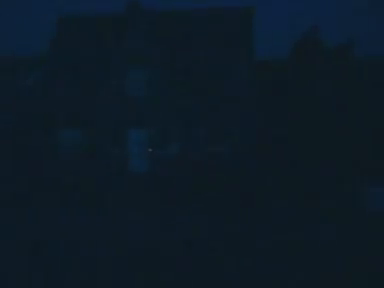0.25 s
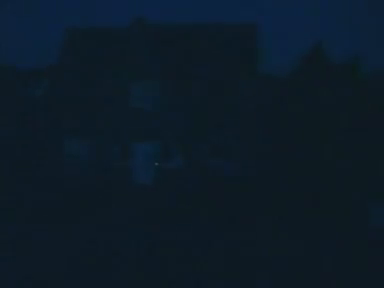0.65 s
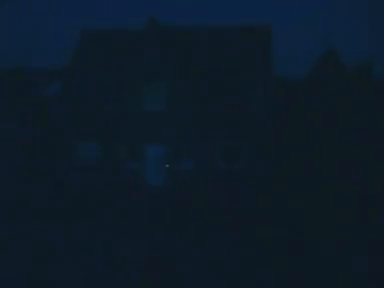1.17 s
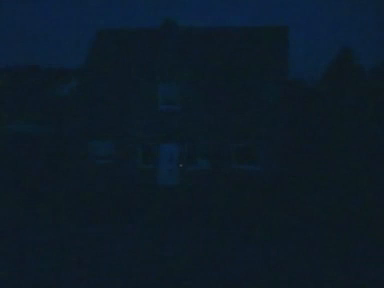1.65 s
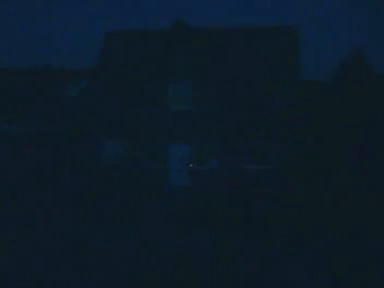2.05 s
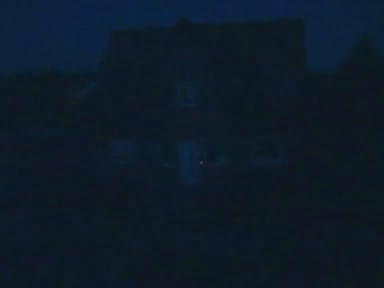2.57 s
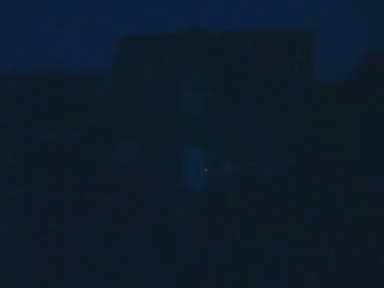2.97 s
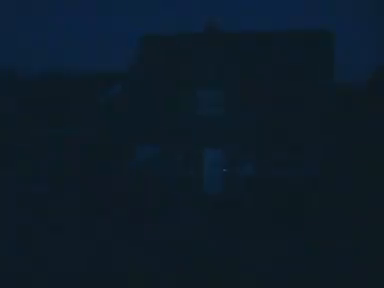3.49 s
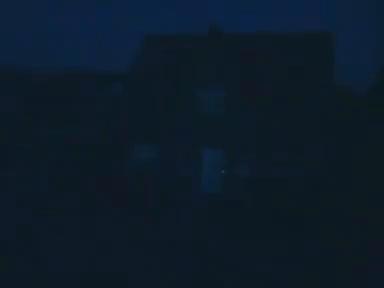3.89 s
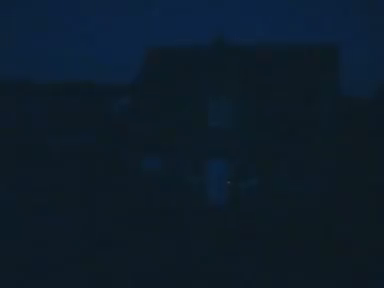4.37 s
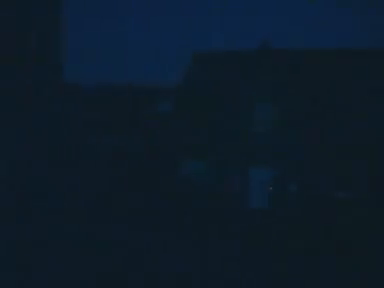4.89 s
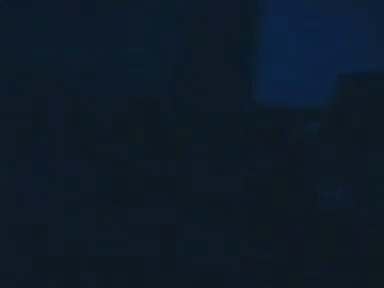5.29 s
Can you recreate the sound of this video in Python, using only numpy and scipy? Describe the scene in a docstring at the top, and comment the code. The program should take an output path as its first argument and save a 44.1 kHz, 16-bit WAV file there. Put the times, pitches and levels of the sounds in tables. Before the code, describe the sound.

Outdoors beside a dark house at dawn, many birds sing at once. Sharp slurs open nearby, then thin robin notes slide and shiver downwards. A rich blackbird flutes in the middle while a small bird adds high hooked chips. The robin briefly returns before a rapid trill and sharp slurs. Walls and trees echo everything; a small camera microphone adds faint hiss and whine.

```python
"""Dawn chorus beside a house, heard through a small camera's hiss and whine over a faint rising rumble.
Near and far, birds whistle and chatter throughout; a songbird in the nearest bush opens with slurs.
A robin slides and shivers downwards, then a blackbird flutes while a small bird adds high hooked notes.
The robin returns, the songbird trills and slurs again. Each note is a nearly pure, shaking tone;
walls throw the songs back as echoes and leaves and trees scatter them as shaped noise."""
import sys
import numpy as np
from scipy import signal
from scipy.fft import rfft, irfft, next_fast_len
from scipy.io import wavfile
from scipy.ndimage import map_coordinates

SR = 44100
rng = np.random.default_rng(int(sys.argv[2]) if len(sys.argv) > 2 else 0)


def to_wav(sig):
    """Store sig (one row per channel, or 1-D mono) as 16-bit WAV at the path in sys.argv[1].

    Samples outside -1..1 are clipped; the rate is SR.
    """
    pcm = np.clip(np.atleast_2d(sig), -1, 1) * 32767
    pcm = np.round(pcm).astype(np.int16)
    wavfile.write(sys.argv[1], SR, pcm.T)  # frames by channels


N = 244314  # length in samples

# Hiss and rumble of the air at the microphone. Each row: frequency in Hz, relative density in dB.
AIR_SPECTRUM = [(15, -41), (25, -3.5), (60, -7), (142, 1.5), (208, -3.5), (262, 0), (384, -5), (847, -6),
                (938, -7), (1270, -8), (2180, -4.5), (3920, -11), (7220, -15), (7800, -14.5),
                (11200, -20.5), (14500, -68.5), (22000, -120)]
# Steady tones of the camera's whine. Each row: frequency in Hz, mean level in dB.
CAMERA_WHINE = [(273, -65.5), (935, -64), (7480, -67), (9868, -73), (11025, -83.5)]
# Course of the low rumble. Each row: time in seconds, relative level in dB.
RUMBLE_LEVEL = [(0, -73), (4.6, -56.5), (5.54, -43)]
# Course of the distant crowd of birds. Each row: time in seconds, relative level in dB.
CROWD_LEVEL = [(0.0, -39), (0.57, -42.5), (0.85, -46.5), (1.37, -42), (2.11, -42), (2.39, -47.5),
               (2.71, -39.5), (3.05, -38.5), (3.19, -40), (3.86, -36), (5.34, -47.5), (5.54, -51.5)]
# Colour of the distant crowd. Each row: frequency in Hz, gain in dB.
CROWD_COLOUR = [(1300, -54), (1800, 0), (2350, 2), (3100, -9), (4000, -8.5), (5500, -23), (7000, -7),
                (8500, -39)]
# Birds farther off. Each row: start in seconds, length in seconds, start pitch in Hz, end pitch in Hz,
# relative level in dB, warble depth in Hz.
FAR_NOTES = [ (0, 0.0654, 2700, 2480, -43.5, 360), (.02, 0.053, 4900, 3600, -47.5, 440),
             (.038, 0.068, 2980, 3000, -43.5, 24), (0.096, .045, 3244, 3259, -38, 220),
             (0.232, .045, 3100, 2730, -44, 200), (0.281, 0.086, 4450, 5250, -52.5, 457),
             (.345, .115, 3142, 2620, -39, 360), (0.514, 0.077, 2450, 2394, -43.5, 250),
             (0.66, 0.0555, 2935, 2226, -44.5, 350), (0.834, 0.043, 4440, 4920, -53.5, 440),
             (0.937, 0.077, 3130, 3157, -42, 88), (1.085, .14, 1720, 1900, -49, 36),
             (1.225, 0.066, 1850, 1810, -44, 10), (1.391, 0.071, 1900, 1835, -39.5, 10),
             (1.462, 0.14, 2620, 2404, -42, 110), (1.563, 0.076, 2720, 2740, -49, 14),
             (1.63, .075, 2570, 2130, -47, 14), (1.704, 0.079, 2200, 1670, -43, 13),
             (1.78, 0.091, 1477, 1468, -48, 8), (1.823, .062, 3220, 3090, -43.5, 60),
             (2, 0.43, 2783, 2621, -51.5, 38), (2.32, .13, 2805, 2852, -52, 17),
             (2.258, 0.28, 2204, 2006, -44.5, 37), (2.859, 0.081, 2066, 1782, -37, 126),
             (2.949, .28, 1656, 1480, -48.5, 7.9), (3.323, 0.077, 2520, 2530, -35.5, 37),
             (3.444, 0.13, 2154, 2144, -39.5, 106), (3.94, .16, 1404, 1700, -56.5, 20),
             (4.028, .07, 2595, 2510, -44.5, 85), (4.078, 0.12, 3037, 3003, -39, 190),
             (4.25, 0.095, 1510, 1690, -51, 12), (4.522, .04, 1980, 1920, -49, 26),
             (4.681, 0.2195, 2200, 3222, -39, 294), (4.756, 0.24, 4830, 5310, -53.5, 660),
             (4.85, 0.11, 3103, 3000, -42.5, 245), (5.178, 0.051, 3130, 3210, -46, 45),
             (5.376, 0.2, 3000, 3100, -53.5, 85)]
# High hooked notes of the small bird. Each row: start in seconds, length in seconds, top pitch in Hz,
# leap in Hz, relative level in dB.
HOOKED_NOTES = [(2.77, 0.025, 7400, 2260, -38), (2.913, 0.0487, 7350, 2690, -37.5),
                (2.965, 0.0337, 7000, 2300, -40.5), (3.096, 0.029, 7190, 2380, -41),
                (3.136, 0.029, 7430, 2644, -38), (3.178, 0.0424, 7610, 2900, -35),
                (3.305, 0.0456, 6800, 200, -47.5), (3.342, 0.028, 5370, 1270, -39),
                (3.416, 0.025, 6650, 402, -44), (3.448, 0.04, 5240, 594, -40.5)]
# The songbird in the nearest bush. Each row: start in seconds, length in seconds, start pitch in Hz, end pitch
# in Hz, upward bow in Hz, relative level in dB. The row at 4.42 s is a wall echo of the 4.28 s line near 6.3
# kHz.
SONGBIRD_SLURS = [ (.008, 0.042, 4600, 7400, -450, -45), (.045, 0.037, 7270, 5300, -600, -46.5),
                  (.062, 0.0378, 5270, 5210, -5, -40.5), (.497, .025, 4430, 5330, 0, -47),
                  (.56, 0.0955, 5900, 4100, -750, -48.5), (.73, 0.066, 4510, 4440, 6, -49),
                  (4.268, 0.04345, 7600, 3630, -420, -43.5), (4.28, .092, 8200, 7900, -260, -41.5),
                  (4.28, 0.134, 6300, 5923, 43, -48), (4.293, 0.057, 3950, 4337, -630, -35),
                  (4.346, 0.0331, 3855, 3240, 927, -29.5), (4.375, 0.069, 6700, 6296, -100, -48),
                  (4.407, 0.024, 2700, 3240, 572.5, -28.5), (4.42, .085, 6050, 6075, 137, -47.5),
                  (4.53, 0.028, 6550, 6830, 427.5, -44), (4.582, .018, 6110, 4020, 130, -36.5),
                  (4.596, 0.0216, 6220, 3720, -160, -34.5), (4.88, .062, 8030, 7210, -160, -55),
                  (5.004, .018, 6100, 3350, 88, -39.5), (5.015, 0.027, 3550, 3545, -3, -36.5)]
# The songbird's trill notes. Each row: start in seconds, relative level in dB.
TRILL_NOTES = [(3.944, -38.5), (3.993, -35.5), (4.045, -35), (4.096, -35), (4.16, -35)]
# Pitch of one flick of the trill. Each row: time in seconds, pitch in Hz.
FLICK_PITCH = [(0, 6030), (.004, 6910), (.007, 6070), (.01, 4200), (.014, 3100)]
# The robin's slurs. Each row: start in seconds, length in seconds, start pitch in Hz, end pitch in Hz,
# upward bow in Hz, relative level in dB.
ROBIN_SLURS = [ (.962, 0.048, 4560, 6150, 550, -53), (1.018, 0.037, 5523, 6500, -500, -48.5),
               (1.056, .028, 6800, 7150, 200, -46), (1.05, 0.11, 2900, 3920, 152, -47.5),
               (1.12, 0.0547, 7217, 6600, 752, -47), (1.144, 0.019, 4963, 4650, 102, -33.5),
               (1.228, .035, 3970, 4030, 0, -50.5), (1.17, 0.037, 3850, 3040, 50, -44),
               (1.307, .047, 4465, 4400, -2, -33.5), (1.339, 0.028, 5600, 5500, 340, -42.5),
               (1.375, 0.026, 4200, 3000, 322, -36), (3.736, .052, 4240, 5120, -6, -42),
               (3.785, 0.051, 4720, 4830, 270, -38.5), (3.795, 0.077, 5670, 5150, 734, -45),
               (3.836, 0.083, 4900, 3900, -4, -45), (3.857, 0.053, 4800, 5120, 585, -39.5),
               (3.862, 0.0294, 8700, 7900, 0, -47)]
# The robin's long descents. Each row: start in seconds, start pitch in Hz, end pitch in Hz,
# relative level in dB.
ROBIN_DESCENTS = [(1.477, 7600, 4760, -42), (1.686, 7840, 5360, -44.5), (1.951, 7980, 5810, -45)]
# Blackbird syllables. Each row: start in seconds, length in seconds, attack in seconds, start, middle and end
# pitch in Hz, relative level in dB, burr depth in Hz. The short row at 3.704 s is a strong wall echo of the
# long syllable before it.
BLACKBIRD_SYLLABLES = [ (2.418, 0.0605, 0.045, 2380, 2385, 2440, -23.5, 146),
                       (2.48, 0.0429, .013, 1830, 1815, 1797, -23, 33.4),
                       (2.594, .158, 0.028, 2520, 2128, 2050, -26, 30),
                       (2.754, 0.065, .007, 2030, 2108, 2173, -22, 83),
                       (2.83, 0.097, .02, 3050, 3057, 2985, -28, 96.4),
                       (3.046, 0.28, 0.015, 2130, 2499, 2594, -22, 63.3),
                       (3.506, .15, .078, 1860, 1857, 1933, -21.5, 18),
                       (3.664, 0.0467, .005, 1909, 1900, 1900, -33, 15),
                       (3.704, .027, 0.0033, 1947, 1882, 1927, -25.5, 18),
                       (3.735, 0.045, 0.0055, 2265, 2300, 2300, -28.5, 140),
                       (3.773, .13, 0.0074, 2182, 2188, 2233, -22.5, 121)]
# Echoes from the walls. Each row: delay in seconds, relative level in dB.
WALL_ECHOES = [(.014, -9.5), (.024, -11), (.126, -16)]
# Ringing among the trees. Each row: frequency in Hz, time to fall by 60 dB in seconds.
TREE_DECAY = [(1000, 0.26), (3000, 1), (8000, 0.48)]
# Treble that birdsong loses on the way. Each row: frequency in Hz, gain in dB.
TREBLE_LOSS = [(6800, 0), (7600, -5.5), (8400, -9.5), (11000, -9.5)]

TOP_HZ = 11250  # the camera's band limit
HOUSE_DELAY = 0.051  # s, the long way round by the house front
NOTE_PEAK = 0.6  # a note is strongest this far through its length
FAR_BOW_HZ = 56.1  # the farther birds' notes all bow a little upwards
HOOK_LEAP_S, HOOK_DROOP_HZ = 0.008, 348  # typical time of the leap; fall from the top by the end
FLICK_S = 0.014  # spacing of the flicks in a trill note
# A descent's length, the power of time by which its fall steepens, and its growth in dB.
DESCENT_S, DESCENT_CURVE, DESCENT_SWELL_DB = 0.158, 1.3, 1.5
# The shiver that grows along a descent: rate, pitch swing, level swing.
SHIVER_HZ, SHIVER_DEPTH_HZ, SHIVER_DB = 52.1, 114, 8.5
# During the attack a blackbird syllable climbs to its pitch and swells by this much.
SCOOP_HZ_PER_S, SCOOP_DB = 9800, 30
# At its end it sags by a share RELAX of the way to a resting pitch, over this part of its length.
REST_HZ, RELAX, RELAX_PART = 1805, 0.597, 0.11


def amp(db):
    """Decibels to gain."""
    return 10 ** (np.asarray(db) / 20)


def unit(x):
    """Scale to rms 1."""
    return x / np.sqrt(np.mean(x ** 2) + 1e-20)


def along(points, hz):
    """Read (Hz, value) points on a log frequency axis."""
    f, v = np.transpose(points)
    return np.interp(np.log(hz + 1), np.log(f + 1), v)


def level_over_time(points):
    """Read (s, dB) points at every sample."""
    s, db = np.transpose(points)
    return np.interp(np.arange(N) / SR, s, db)


def wobble(rate, size):
    """A smooth random curve, rate knots a second."""
    knots = rng.standard_normal(int(size * rate / SR) + 4)
    return map_coordinates(knots, [np.arange(size) * rate / SR])


def filtered(x, response):
    """Multiply the spectrum of x by a response of frequency."""
    m = next_fast_len(N + 8192)  # padded, so the end does not wrap to the start
    return irfft(rfft(x, m) * response(np.fft.rfftfreq(m, 1 / SR)), m)[:N]


def add(track, s, sound):
    """Mix a sound into a track at time s."""
    start = max(round(s * SR), 0)
    part = track[start:start + len(sound)]
    part += sound[:len(part)]


def arc(length, start, middle, end):
    """A pitch bending smoothly through three points."""
    u = np.linspace(0, 1, int(length * SR))
    return np.polyval(np.polyfit([0, .5, 1], [start, middle, end], 2), u)


def whistle(hz, warble_hz, rate_hz, edge, rough=0.535, flutter_db=2.5, overtone_db=-36):
    """The syrinx: a nearly pure tone whose pitch and strength shake quickly and unevenly."""
    size = len(hz)
    uneven_rate = rate_hz * (1 + 0.331 * wobble(90, size))
    shake = np.sin(2 * np.pi * np.cumsum(uneven_rate) / SR)
    shaken_hz = hz + warble_hz * (shake + rough * wobble(900, size))
    phase = 2 * np.pi * np.cumsum(shaken_hz) / SR
    tone = np.sin(phase) + amp(overtone_db) * np.sin(2 * phase)
    tone = tone * amp(flutter_db * wobble(198.4, size))
    return unit(tone) * signal.windows.tukey(size, np.clip(edge, 0, 1))


def phrase(notes, rate_hz, edge, rough, flutter_db, swell_db):
    """One bowed, warbled glide for each note, which swells to its peak and eases off."""
    song = np.zeros(N)
    for s, length, start, end, bow_hz, db, warble_hz in notes:
        hz = arc(length, start, (start + end) / 2 + bow_hz, end)
        tone = whistle(hz, warble_hz, rate_hz, edge, rough, flutter_db)
        off_peak = np.linspace(0, 1, len(tone)) / NOTE_PEAK - 1
        add(song, s, amp(db) * unit(amp(-swell_db * off_peak ** 2) * tone))
    return song


def warbled(notes, steady_hz, hz_per_octave_s):
    """Give each slur a warble depth: the faster the glide, the more it shakes."""
    out = []
    for s, length, start, end, bow_hz, db in notes:
        octaves_per_s = abs(np.log2(end / start)) / length
        out.append((s, length, start, end, bow_hz, db, steady_hz + hz_per_octave_s * octaves_per_s))
    return out


def house_echo(x, echo_db):
    """A bird facing the house is heard twice, the second time off the house front."""
    out = x.copy()
    add(out, HOUSE_DELAY, amp(echo_db) * x)
    return out


def outdoors(x, walls_db, leaves_db, trees_db):
    """Direct sound, distinct wall echoes, a quick scatter from near leaves and a long tail from the trees."""
    out = x.copy()
    for delay, db in WALL_ECHOES:
        add(out, delay, amp(db + walls_db) * x)
    # The tail is noise that dies away at a different pace in each band.
    hz, t, bands = signal.stft(rng.standard_normal(SR), SR, nperseg=256)
    decay = 1000. ** (-t / along(TREE_DECAY, hz)[:, None])
    tail = signal.istft(bands * decay, SR, nperseg=256)[1][:SR]
    age = np.arange(SR) / SR / 0.0039
    scatter = rng.standard_normal(SR) * age * np.exp(-age)  # builds up just after the direct sound
    leaves = amp(leaves_db) * scatter / np.linalg.norm(scatter)
    trees = amp(trees_db) * tail / np.linalg.norm(tail)
    return out + signal.fftconvolve(x, leaves + trees)[:N]


def background():
    """Steady noise hiss, a low noise band that rises, and the camera's slightly unsteady sine whine."""
    t = np.arange(N) / SR
    air = unit(filtered(rng.standard_normal(N), lambda hz: amp(along(AIR_SPECTRUM, hz))))
    low = unit(filtered(rng.standard_normal(N), lambda hz: np.exp(-((hz - 240) / 130) ** 2)))
    rumble = amp(level_over_time(RUMBLE_LEVEL) - 12.5) * low
    whine = np.zeros(N)
    for hz, db in CAMERA_WHINE:
        level = amp(db + 0.36 * wobble(2.4, N))
        whine += level * np.sin(2 * np.pi * hz * t + 0.8 * wobble(8.4, N))
    return amp(-49.5) * air + rumble + np.sqrt(2) * whine  # root 2 takes sine peak to rms


def chorus(count=400):
    """Many distant chirps and whistles, heard as much through their echoes as directly."""
    song = np.zeros(N)
    for when, pitch, life, bend, slide, loudness in rng.random((count, 6)):
        hz = 1700 * 4.2 ** pitch
        contour = hz * arc(0.03564 + .11 * life, 1, 1 + 0.27 * (bend - .5), 1 + 0.5476 * (slide - .5))
        chirp = whistle(contour, warble_hz=46, rate_hz=71, edge=0.89)
        add(song, when * N / SR, amp(7.2 * loudness) * chirp)
    song = outdoors(song, walls_db=4, leaves_db=-5, trees_db=0)
    crowd = filtered(song, lambda hz: amp(along(CROWD_COLOUR, hz)))
    return unit(crowd) * amp(level_over_time(CROWD_LEVEL) - 5.5)


def neighbours():
    """Whistles and buzzes from farther gardens: warbled glides blurred by the trees."""
    notes = [(s, length, start, end, FAR_BOW_HZ, db, warble_hz)
             for s, length, start, end, db, warble_hz in FAR_NOTES]
    song = phrase(notes, rate_hz=105, edge=0.42, rough=0.37, flutter_db=3.0, swell_db=3)
    return outdoors(song, walls_db=-4, leaves_db=-10, trees_db=-9)


def small_bird():
    """Each note leaps to its top pitch, never twice at quite the same speed, and droops from there."""
    song = np.zeros(N)
    for s, length, top, leap_hz, db in HOOKED_NOTES:
        t = np.arange(int(length * SR)) / SR
        leap_s = HOOK_LEAP_S * np.exp(0.198 * rng.standard_normal())
        leap = leap_hz * np.exp(-(t / leap_s) ** 2)
        droop = HOOK_DROOP_HZ * (t / length) ** 3
        tone = whistle(top - leap - droop, warble_hz=150, rate_hz=260, edge=0.16, rough=0.7, flutter_db=4.5)
        add(song, s, amp(db) * tone)
    return outdoors(house_echo(song, echo_db=-5), walls_db=-3, leaves_db=-8, trees_db=-8)


def songbird():
    """Sharp slurs, and a trill of which each note is three quick flicks of pitch."""
    slurs = warbled(SONGBIRD_SLURS, steady_hz=42, hz_per_octave_s=6.6)
    song = phrase(slurs, rate_hz=220, edge=0.22, rough=0.44, flutter_db=2.5, swell_db=6.5)
    times, pitches = np.transpose(FLICK_PITCH)
    flick = np.interp(np.arange(0, times[-1], 1 / SR), times, pitches)
    for s, db in TRILL_NOTES:
        for k, flick_db in enumerate([1, 0, -3]):
            tone = whistle(flick, warble_hz=200.4, rate_hz=332, edge=0.19)
            add(song, s + k * FLICK_S, amp(db + flick_db) * tone)
    return amp(.5) * outdoors(song, walls_db=-2, leaves_db=-9, trees_db=-10)


def descent(start, end):
    """A thin note that swells, falls ever faster and starts to shiver."""
    u = np.linspace(0, 1, int(DESCENT_S * SR))
    shiver = np.sqrt(u) * np.sin(2 * np.pi * (SHIVER_HZ * DESCENT_S * u + rng.random()))
    hz = start + (end - start) * u ** DESCENT_CURVE + SHIVER_DEPTH_HZ * shiver
    tone = whistle(hz, warble_hz=130, rate_hz=710, edge=0.26, rough=.4, flutter_db=2.0)
    return unit(amp(SHIVER_DB * shiver + DESCENT_SWELL_DB * u) * tone)


def robin():
    """Thin sliding notes and long descents, each doubled by the house front."""
    slurs = warbled(ROBIN_SLURS, steady_hz=95, hz_per_octave_s=1.3)
    song = phrase(slurs, rate_hz=440, edge=0.1, rough=0.26, flutter_db=4.0, swell_db=4.5)
    for s, start, end, db in ROBIN_DESCENTS:
        add(song, s, amp(db) * descent(start, end))
    return outdoors(house_echo(song, echo_db=-3.5), walls_db=-4, leaves_db=-12, trees_db=-11)


def blackbird():
    """Fluted syllables that scoop up, sag at the end and may break into a burr, lightly echoed."""
    song = np.zeros(N)
    for s, length, attack, start, middle, end, db, burr_hz in BLACKBIRD_SYLLABLES:
        hz = arc(length, start, middle, end)
        t = np.arange(len(hz)) / SR
        to_go = np.maximum(attack - t, 0)  # attack time still left
        sag = RELAX * (REST_HZ - hz) * np.exp(-((1 - t / length) / RELAX_PART) ** 2)
        hz = hz - SCOOP_HZ_PER_S * to_go + sag
        tone = whistle(hz, burr_hz, rate_hz=380, edge=0.089, rough=0.42, flutter_db=2.36)
        add(song, s, amp(db - SCOOP_DB * to_go / attack) * tone)
    return amp(-3.5) * outdoors(song, walls_db=-3.0, leaves_db=-13, trees_db=-13)


def scene():
    """All the birds, their treble dulled on the way to the microphone, over the background."""
    birds = chorus() + neighbours() + small_bird() + songbird() + robin() + blackbird()
    return (filtered(birds, lambda hz: amp(along(TREBLE_LOSS, hz))) + background())[None]


def record(dry):
    """The camera keeps nothing above its band limit."""
    return filtered(dry[0], lambda hz: hz < TOP_HZ)[None]


dry = scene()
out = record(dry)
to_wav(out)
```